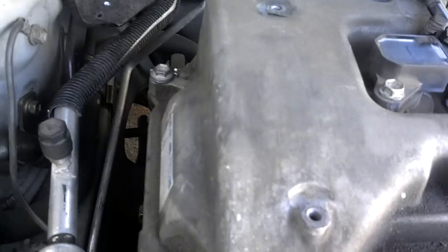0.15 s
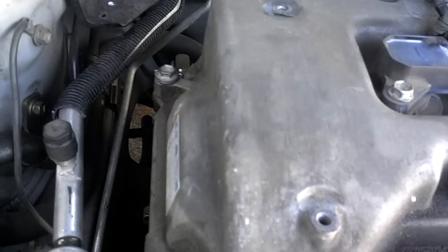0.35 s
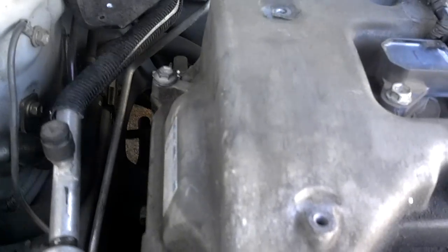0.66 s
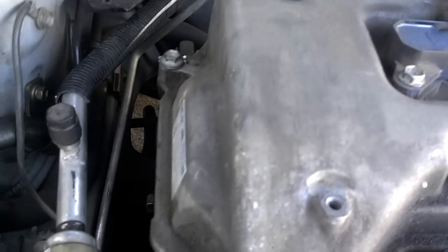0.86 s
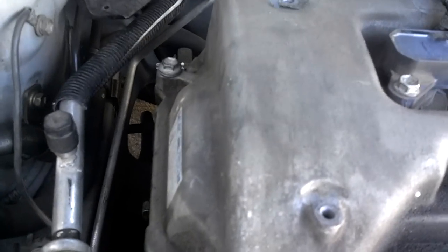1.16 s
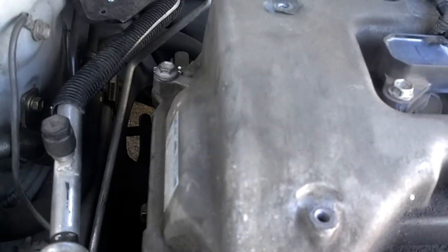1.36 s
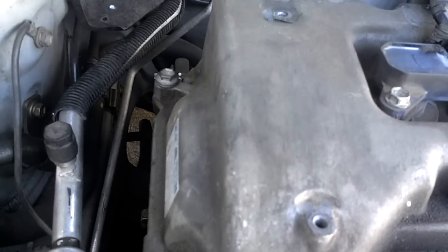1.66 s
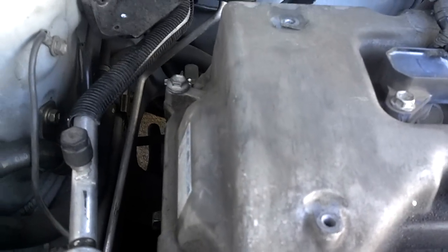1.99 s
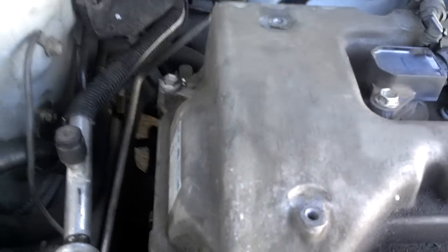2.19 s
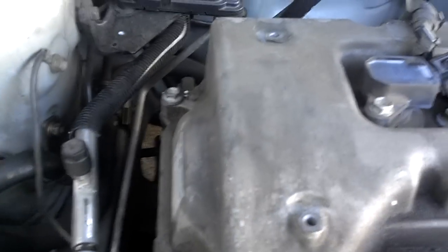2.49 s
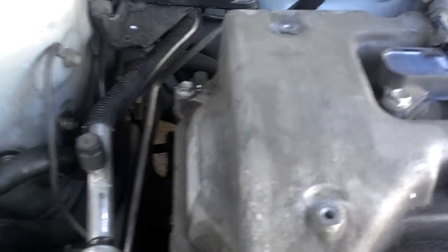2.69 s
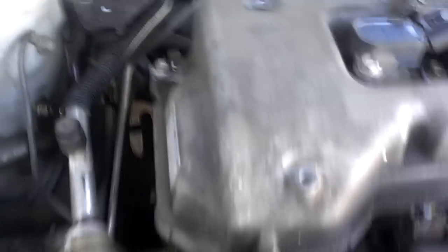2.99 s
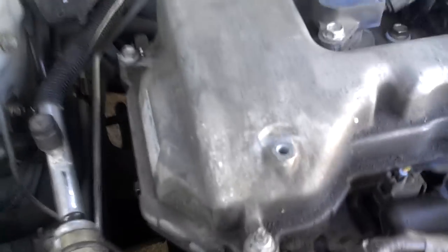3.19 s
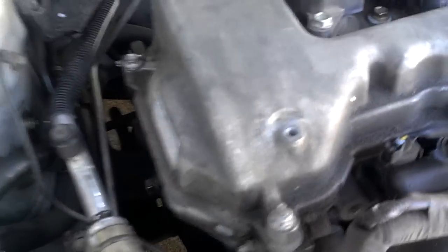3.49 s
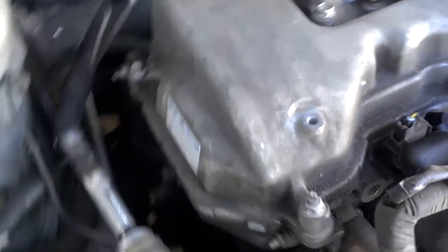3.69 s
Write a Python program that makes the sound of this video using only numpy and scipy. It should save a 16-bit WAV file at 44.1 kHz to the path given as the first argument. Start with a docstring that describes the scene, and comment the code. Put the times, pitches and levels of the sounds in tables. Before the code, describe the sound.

A worn car engine idles, knocking loudly with short midrange metallic blows and bright clicks. At 0-0.3 s they come about 25 per second, with a brief weaker gap near 0.3-0.4 s, then settle to 16-20, uneven after 1 s. Churn and hiss fade and a faint hum sinks until about 2 s; from 2.6 s heavier thumps and thin high sizzle grow, the block drifting right until 3.85 s.

```python
"""A belt-driven accessory knocks on a worn, idling car engine: each blow rings one set of damped metal modes of
the block. Soft thuds and a light rattle excite the same modes. Shaped noise gives the churn, hiss, ticks and
sizzle; shaft harmonics give a hum that sinks as the revs settle, over a steady drone. The hood is open and the
microphone, just above the valve cover, moves: the sizzle shifts, the block drifts right."""
import sys
import numpy as np
from scipy import signal
from scipy.fft import rfft, irfft
from scipy.io import wavfile

SR = 44100
rng = np.random.default_rng(int(sys.argv[2]) if len(sys.argv) > 2 else 0)


def persist_wave(psi):
    """Save psi, clipped to +-1, as 16-bit WAV."""
    counts = np.round(np.clip(psi, -1, 1) * 32767).astype(np.int16)
    wavfile.write(sys.argv[1], SR, np.atleast_2d(counts).T)


N = 169785  # samples
T = np.arange(N) / SR  # s
RING_T = np.arange(6000) / SR  # s, time axis of one short event

# Knocks of the belt-driven accessory: t/s, relative ring level/dB, relative thump level/dB, relative click
# level/dB
KNOCKS = [(0.0, 1.2, 1.5, -1.5), (0.043, -2, 2.5, -3), (0.0784, 0.5, 0.5, -2), (0.1167, 0, 3, -2),
          (0.1564, -2, 1, -2.5), (0.198, 0.5, 4.5, -3), (0.2393, 0.5, 2, 0.5), (0.2628, -13, -5, -20),
          (0.2805, -1, 4.5, -2), (0.3628, -14, -11, -31), (0.4034, -6.5, 1.5, -20), (0.444, -1, 0.5, -3.5),
          (0.4859, -1.5, -6, -0.5), (0.5272, -1.5, 2.5, -1), (0.5692, 2, 3, 0.5), (0.6128, 0.2, 6, -0.5),
          (0.6574, 0.5, 0, -1.5), (0.702, -1.5, 1, 0), (0.7484, -0.5, 2, 1), (0.7961, 0.3, 3.5, 1),
          (0.8444, 0.2, 1.5, 0), (0.8752, -10, 5, -4), (0.8915, 1, 6, -2), (0.9419, -9, -20, -4.5),
          (0.9931, 0, 2, 0), (1.0431, -3.5, -1, -4.5), (1.0952, 1.5, 4.5, 1.5), (1.1312, -8.5, 6, -6),
          (1.147, -7, -1, -23), (1.203, -6, -2, -4), (1.2565, -8.5, 1.5, -15), (1.3118, -1.5, 0.5, -1),
          (1.3677, 1, 2, 0.5), (1.423, 0.8, 3.5, -0.5), (1.4793, 1, 6.5, 0), (1.538, 0, -2, -1),
          (1.5999, -5, 2.5, -5.5), (1.6557, -3, 3, -3.5), (1.7092, -1.2, 5.5, -6.5), (1.776, 0.2, 4, -0.5),
          (1.838, -3, 1.5, -3), (1.8718, -17, 3, -10), (1.8994, -2.5, -1.5, -2), (1.94, -12.5, -1.5, -6),
          (2.0143, -0.3, 4, 0.5), (2.0771, 1, 3, 0.5), (2.1101, -11, 3, -12), (2.1393, -3.5, 2, -3.5),
          (2.1776, -8, 0, -8), (2.1945, -14, 0, -25), (2.259, -7.5, -1, -6.5), (2.3172, 0.8, 4.5, 1.5),
          (2.377, 1.5, 5.5, 1), (2.4126, -6, 4.5, -4.5), (2.439, -1.7, 3, -3), (2.478, -13, 0.5, -5),
          (2.5567, 1, 6.5, 3), (2.6114, 4, 8.5, -4), (2.6457, -5.5, 7.5, -17), (2.675, -3.5, -13, -7),
          (2.7137, -13, -14, -12), (2.7318, -5, 3, -26), (2.7937, 1, 4.5, 0.5), (2.8302, -21, 2, -25),
          (2.849, 3.5, 7.5, -6), (2.912, 1.5, 3, -1), (2.9467, -7, -9, -16), (2.9735, 2, 5, -3),
          (3.0141, 2, 9, -2), (3.0907, 2, 6, 1), (3.1487, 1, 6.5, -1), (3.2085, 1.5, 3.5, -2),
          (3.2459, -1.7, 7.5, -4.5), (3.2646, -3.5, 8.5, -13), (3.327, 0.5, 7, -1), (3.3856, 3, 6, 0),
          (3.4449, 0, 2.5, -6), (3.478, -11, 3, -22), (3.5061, -1, 4.5, -1.5), (3.5435, -8, -5, -18),
          (3.5611, -8, -2, -24), (3.6221, 2.5, 5.5, 2), (3.6777, -3.5, 2.5, -20),
          (3.7144, -11.5, -0.5, -23), (3.7408, -9.5, -4, -21), (3.7778, -10, -9, -6.5),
          (3.7971, 2, 6, -1.5)]
# Soft thuds of the block between knocks: t/s, relative level/dB
THUDS = [(1.112, -11), (1.739, 0), (2.042, -1), (2.343, -1), (2.493, -1), (2.594, -11), (2.879, -15),
         (3.044, -4), (3.179, 0.5), (3.358, -2)]
# Modes of the block and cover: f/Hz, relative left level/dB, relative right level/dB, 60 dB decay time/s
BLOCK_MODES = [(510.9, 17.5, 19, 0.1), (680.0, 15, 7.5, 0.31), (801.7, 15.5, 17.5, 0.18),
               (1016, 18, 16.5, 0.056), (1120, 11.5, 16, 0.28), (1237, 13, 18, 0.12),
               (1311.7, 21, 20.5, 0.058), (1415.0, 17.5, 16.5, 0.014), (1537, 26.5, 26.5, 0.13),
               (1581, 23, 22.5, 0.054), (1633, 22.5, 23, 0.02), (1774.6, 29.9, 30, 0.034),
               (1773.2, 29, 30.0, 0.043), (1980, 24, 20.5, 0.075), (2084, 18.5, 5.5, 0.097),
               (2127, 13.5, 1.5, 0.041), (2290, 17, 19, 0.059), (2347, 20.5, 16.5, 0.1)]
# Pan of the block: t/s, left minus right level/dB
BLOCK_PAN = [(2.3, 1), (3.6, -2)]
THUMP_BELOW_HZ, RADIATES_BELOW_HZ = 700, 2400
RING_DB, THUMP_DB, MODE_SPREAD_DB = 1, -1.5, 0.71
DISPERSION = 0.099  # rad per squared step from the middle of the mode list
RING_LEAD_S = 0.001222  # the block starts to move just before the click
ECHO_GAIN, ECHO_S = -0.25, 0.004803  # reflection off the left wall of the engine bay

# Spectrum of the faint loose clatter in each knock: f/Hz, relative level/dB
CLATTER = [(250, -33), (900, -13), (1600, 1.5), (2200, 0.5), (2600, -26)]
CLATTER_DB, CLATTER_RISE_S, CLATTER_T60_S = -25.5, 0.00234, 0.072
# Spectrum of the bright click of each knock: f/Hz, relative level/dB
CLICK = [(2500, -16.5), (3700, 1.5), (4900, -28.5), (6200, -3), (7200, 6.5), (8200, 1), (9000, -7),
         (10300, -18.5), (15500, -21.5)]
CLICK_DB, CLICK_RISE_S, CLICK_T60_S = -27, 0.0015, 0.065
CLICK_PAN_DB = 2  # left up and right down by this much
# Thin ring of the knocking accessory within the click: f/Hz, relative level/dB
PING = [(8113, -4), (8887, -14.5)]
PING_T60_S = 0.066
RATTLE_PER_S, RATTLE_DB, RATTLE_SPREAD_DB = 110, -21, 1

# Spectrum of the engine's churn: f/Hz, relative level/dB (per Hz)
CHURN = [(55, -44), (90, -22.5), (140, -10), (200, -14), (300, -9), (420, -4.5), (520, 3.5), (620, -1.5),
         (1000, 0.5), (1550, -1), (2150, 1), (2550, -40)]
# Level of the churn: t/s, level/dB
CHURN_LEVEL = [(0, -34.5), (.9, -38.5), (1.5, -39), (2.25, -43), (2.6, -38.5), (3.85, -42.5)]
# Spectrum of the hiss of belts and valve gear: f/Hz, relative level/dB (per Hz)
HISS = [(1500, -25), (2650, 1), (3600, 3), (4800, -4.5), (5800, -3.5), (7000, -1), (8700, 3),
        (10000, -10.5), (12000, -4.5), (13800, -12.5), (15500, -5.5)]
# Level of the hiss: t/s, level/dB
HISS_LEVEL = [(0, -32), (.4, -35.5), (1.2, -38), (2.1, -42), (2.6, -38.5), (3.3, -39.5), (3.85, -41)]
HISS_FLUTTER_DB, CHURN_FLUTTER_DB = 2, 3  # rms depth
TICKS_PER_S, TICKS_DB, TICKS_SPREAD_DB = 44, -39.5, 0.5
TICK_RISE_S, TICK_T60_S = 0.0015, 0.04

# Narrow sizzles of rubbing parts: f/Hz, width/Hz, left level/dB, right level/dB (before the level curve)
SIZZLES = [(5400, 230, -76, -49.5), (6874, 450, -37, -38.5), (8730, 650, -46, -49)]
# Level curve of the sizzles: t/s, relative level/dB
SIZZLE_LEVEL = [(0, -5.5), (2.25, -6), (2.65, 1), (3.2, 0.5), (3.85, -3)]
# Thin whistle in a halo of hiss: f/Hz, width/Hz, left level/dB, right level/dB (before the level curve)
WHISTLE = [(12100, 560, -52, -41.5), (12150, 16, -53.5, -45.5)]
# Level curve of the whistle: t/s, relative level/dB
WHISTLE_LEVEL = [(1.1, -21), (1.33, -6), (2.3, -4), (2.75, 2.5), (3.5, -2)]

# Shaft speed: t/s, speed/(turns per s)
SPEED = [(0, 24.5), (.41, 19.6), (.67, 19.3), (1.03, 18.5), (1.5, 15.1), (2, 14.3), (3.85, 14.4)]
# Harmonics (orders) of the shaft: multiple of the speed, rms level/dB at the starting speed
ORDERS = [(6, -66.5), (8, -59), (12, -65), (18, -69)]
HUM_SPEED_POWER, DRONE_HZ, DRONE_DB = 2.9, 239, -67.5

# Phase by which the left side leads: f/Hz, phase/rad
LEAD = [(500, 0.3), (1450, 0.18), (1750, 1.23), (2000, 2.67), (2600, 3.07), (3100, 0.68), (4200, 0.3),
        (5700, 1.45)]
# Correlation of noise at the left and right ports: f/Hz, coefficient (0-1)
ALIKE = [(150, 0.03), (450, 0.81), (1300, 0.95), (2000, 0.49), (2650, 0.89), (3600, 0.34), (8000, 0.13)]
OVERLOAD_DB = -3  # level at which the microphone rounds off peaks
EDGE_HZ = 15850  # upper band limit


def amp(db):
    """Level definition: 20 dB is a factor of ten in amplitude."""
    return 10 ** (np.asarray(db) / 20)


def unit(x):
    """Normalization to a root-mean-square amplitude of one."""
    return x / np.sqrt(np.mean(x ** 2) + 1e-20)


def read(points, hz):
    """Interpolation of a spectrum, linear in log frequency."""
    f, value = np.transpose(points)
    return np.interp(np.log(hz + 1), np.log(f + 1), value)


def level(points):
    """Amplitude envelope, interpolated linearly in dB."""
    return amp(np.interp(T, *np.transpose(points)))


def add(mix, s, sound):
    """Superposition of a stereo event starting at time s."""
    start = max(round(s * SR), 0)
    part = mix[:, start:][:, :sound.shape[1]]
    part += sound[:, :part.shape[1]]


def noise(spectrum, size):
    """Filtered white noise, partly correlated at the two microphone ports."""
    hz = np.fft.rfftfreq(size, 1 / SR)
    left, other = rfft(rng.standard_normal((2, size)))
    alike = np.clip(read(ALIKE, hz), -1, 1)
    right = alike * left + np.sqrt(1 - alike ** 2) * other
    return unit(irfft(np.array([left, right]) * amp(read(spectrum, hz)), size))


def flutter(depth_db, rate_hz):
    """Amplitude modulation by low-passed noise, acting on the level in dB."""
    hz = np.fft.rfftfreq(N, 1 / SR)
    slow = irfft(rfft(rng.standard_normal(N)) / (1 + (hz / rate_hz) ** 2), N)
    return amp(depth_db * unit(slow))


def burst(rise_s, t60):
    """Transient envelope: a quadratic rise, then exponential damping."""
    rise = np.minimum(RING_T / rise_s, 1) ** 2
    return rise * amp(-60 * np.maximum(RING_T - rise_s, 0) / t60)


def hum():
    """Harmonic radiation: shaft orders follow the speed in pitch and level, beside one steady drone."""
    speed = np.interp(T, *np.transpose(SPEED))
    turns = np.cumsum(speed) / SR
    orders = sum(amp(db) * np.sin(2 * np.pi * (k * turns + rng.random())) for k, db in ORDERS)
    orders = orders * (speed / speed[0]) ** HUM_SPEED_POWER
    drone = amp(DRONE_DB) * np.sin(2 * np.pi * DRONE_HZ * T)
    return np.sqrt(2) * (orders + drone)  # rms to peak


def churn():
    """Modulated broadband noise: the rough body sound of the turning engine."""
    return noise(CHURN, N) * level(CHURN_LEVEL) * flutter(CHURN_FLUTTER_DB, rate_hz=72)


def hiss():
    """Modulated friction noise of belts and valve gear."""
    return noise(HISS, N) * level(HISS_LEVEL) * flutter(HISS_FLUTTER_DB, rate_hz=35)


def ticks():
    """Random impulsive excitation: small dry ticks of the valve gear, coloured like the hiss."""
    out, count = np.zeros((2, N)), int(TICKS_PER_S * N / SR)
    times = rng.uniform(0, N / SR, count)
    levels = TICKS_DB + TICKS_SPREAD_DB * rng.standard_normal(count)
    for s, db in zip(times, levels):
        add(out, s, amp(db) * noise(HISS, len(RING_T)) * burst(TICK_RISE_S, TICK_T60_S))
    return out


def sizzle(bands, curve):
    """Resonant filtering of noise: narrow bands of rubbing parts, whose level shifts as the microphone moves."""
    hz, out = np.fft.rfftfreq(N, 1 / SR), np.zeros((2, N))
    for centre, width, left_db, right_db in bands:
        resonance = 1 / (1 + (2 * (hz - centre) / width) ** 2)  # full width at half amplitude
        band = irfft(rfft(rng.standard_normal((2, N))) * resonance, N)
        out += unit(band) * amp([[left_db], [right_db]])
    return out * level(curve)


def block_modes(radiates_above_hz=290):
    """Modal superposition: damped sinusoids, spread by dispersion; the metal radiates mainly the midrange."""
    rings = []
    for k, (hz, left_db, right_db, t60) in enumerate(BLOCK_MODES):
        # scaling by the decay rate makes the levels those of the resonance peaks
        height = 2 * np.log(1000) / (t60 * SR) * amp([[left_db], [right_db]])
        lag = np.pi * k - DISPERSION * (k - len(BLOCK_MODES) / 2) ** 2
        rings.append(height * np.sin(2 * np.pi * hz * RING_T - lag) * amp(-60 * RING_T / t60))
    low_pass = signal.butter(8, RADIATES_BELOW_HZ, fs=SR, output="sos")
    high_pass = signal.butter(2, radiates_above_hz, "high", fs=SR, output="sos")
    rings = signal.sosfilt(low_pass, np.array(rings))
    echo = np.array([np.interp(RING_T - ECHO_S, RING_T, left) for left in rings[:, 0]])
    rings[:, 0] += ECHO_GAIN * echo
    return signal.sosfilt(high_pass, rings)


def strike(modes, ring_db, thump_db):
    """Modal excitation: one blow sets the level of each mode, with a slightly random balance."""
    low = np.array(BLOCK_MODES)[:, 0] < THUMP_BELOW_HZ
    db = np.where(low, THUMP_DB + thump_db, RING_DB + ring_db)
    db = db + MODE_SPREAD_DB * rng.standard_normal(len(low))
    return np.tensordot(amp(db), modes, 1)


def rattle(modes):
    """Dense random excitation: many light taps of the valve gear on the same metal."""
    out, count = np.zeros((2, N)), int(RATTLE_PER_S * N / SR)
    times = rng.uniform(0, N / SR, count)
    levels = RATTLE_DB + RATTLE_SPREAD_DB * rng.standard_normal(count)
    for s, db in zip(times, levels):
        add(out, s, strike(modes, db, db))
    return out


def thuds(modes, ring_db=-15, thump_db=-3):
    """Selective excitation: dull blows stir mainly the low modes."""
    out = np.zeros((2, N))
    for s, db in THUDS:
        add(out, s, strike(modes, db + ring_db, db + thump_db))
    return out


def knocks(modes):
    """Impact: each blow rings the block and adds a faint loose clatter and a bright, thinly ringing click."""
    out, size = np.zeros((2, N)), len(RING_T)
    usual_click = noise(CLICK, size)  # the part of the click common to all knocks
    ping = sum(amp(db) * np.sin(2 * np.pi * hz * RING_T) for hz, db in PING)
    ping = ping * burst(CLICK_RISE_S, PING_T60_S)
    for s, ring_db, thump_db, click_db in KNOCKS:
        clatter = noise(CLATTER, size) * burst(CLATTER_RISE_S, CLATTER_T60_S)
        click = unit(usual_click + noise(CLICK, size)) * burst(CLICK_RISE_S, CLICK_T60_S)
        click = (click + ping) * amp([[CLICK_PAN_DB], [-CLICK_PAN_DB]])
        add(out, s - RING_LEAD_S, strike(modes, ring_db, thump_db))
        add(out, s, amp(CLATTER_DB + ring_db) * clatter + amp(CLICK_DB + click_db) * click)
    return out


def scene():
    """Superposition of all sources; the block drifts to the right as the microphone turns."""
    treble = hiss() + ticks() + sizzle(SIZZLES, SIZZLE_LEVEL) + sizzle(WHISTLE, WHISTLE_LEVEL)
    modes = block_modes()
    pan = np.sqrt(level(BLOCK_PAN))  # half the level difference on each side
    block = (rattle(modes) + thuds(modes) + knocks(modes)) * np.array([pan, 1 / pan])
    return hum() + churn() + treble + block


def record(dry, low_cut_hz=85):
    """Transduction: phase lag between the ports, low cut, soft saturation and band limit."""
    lag = read(LEAD, np.fft.rfftfreq(N, 1 / SR))
    right = irfft(rfft(dry[1]) * np.exp(-1j * lag), N)
    low_cut = signal.butter(2, low_cut_hz, "high", fs=SR, output="sos")
    heard = signal.sosfilt(low_cut, np.array([dry[0], right]))
    heard = amp(OVERLOAD_DB) * np.tanh(heard / amp(OVERLOAD_DB))
    band_limit = signal.firwin(1023, EDGE_HZ, window=("kaiser", 9), fs=SR)
    return signal.oaconvolve(heard, band_limit[None], "same")


dry = scene()
out = record(dry)
persist_wave(out)
```